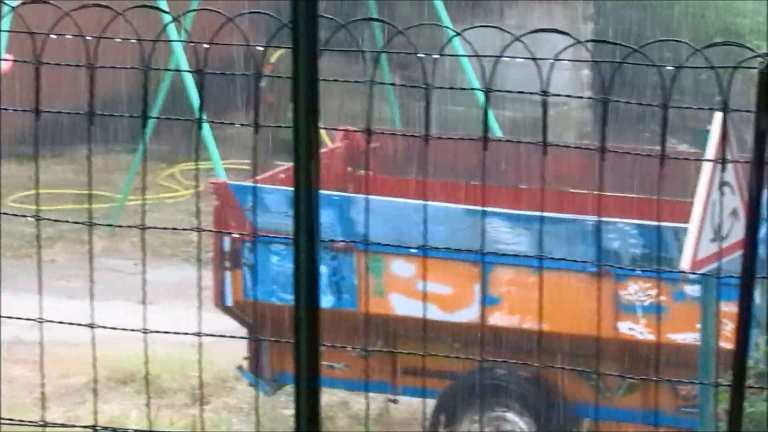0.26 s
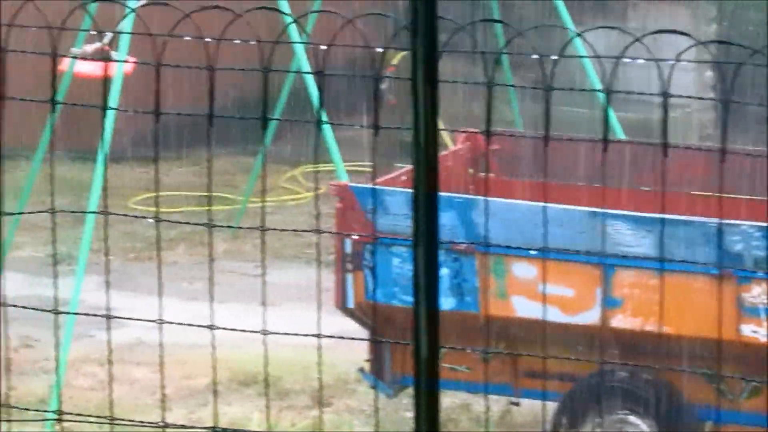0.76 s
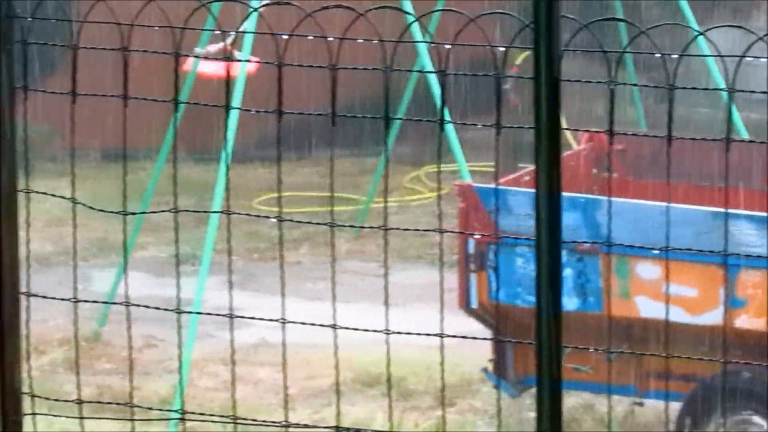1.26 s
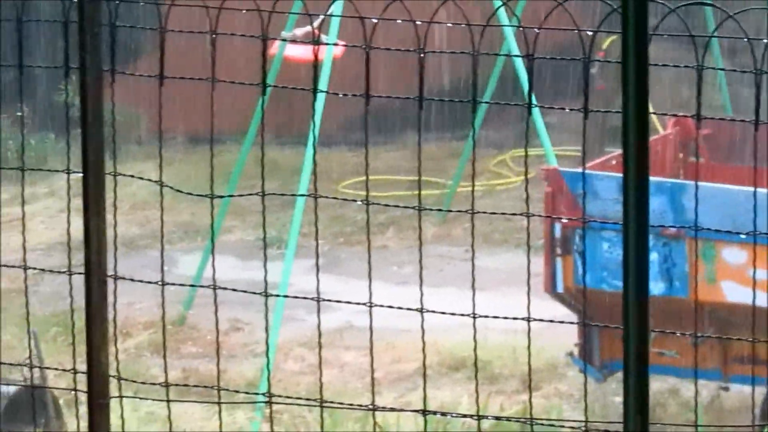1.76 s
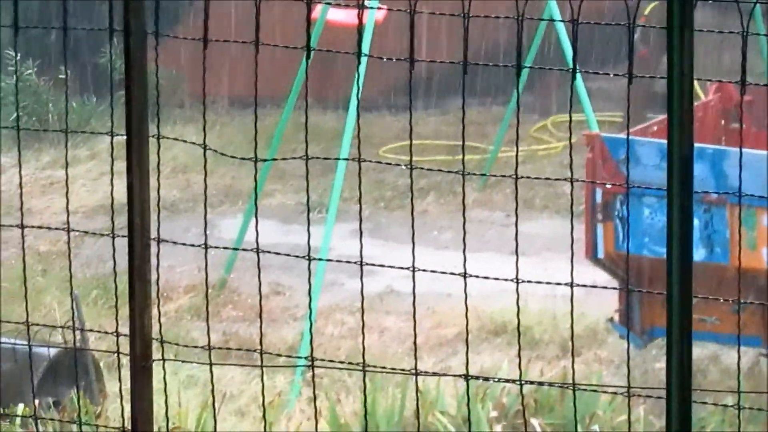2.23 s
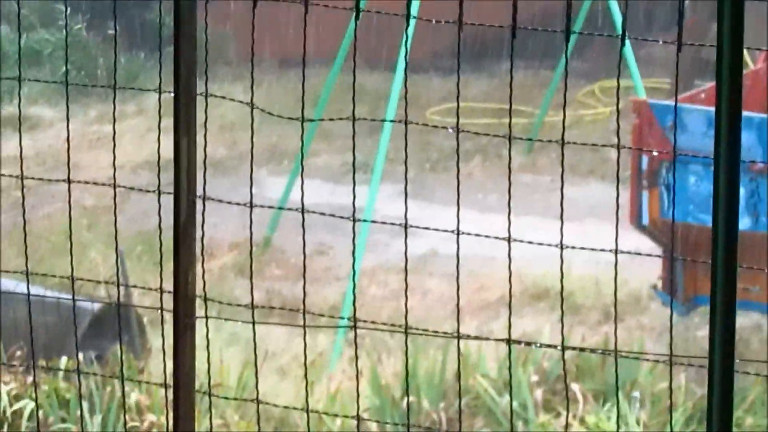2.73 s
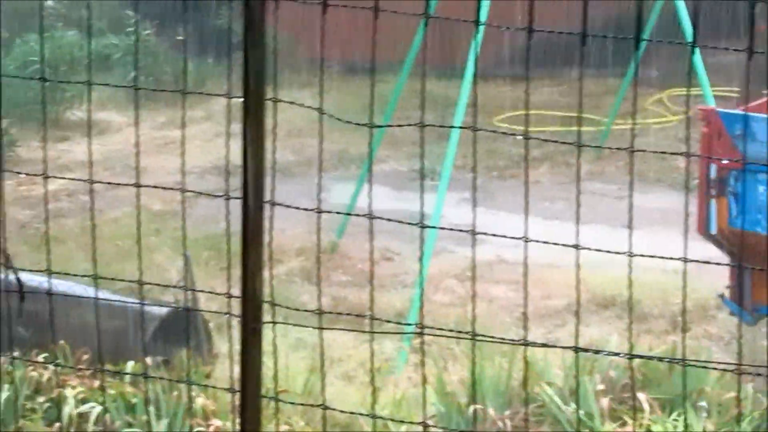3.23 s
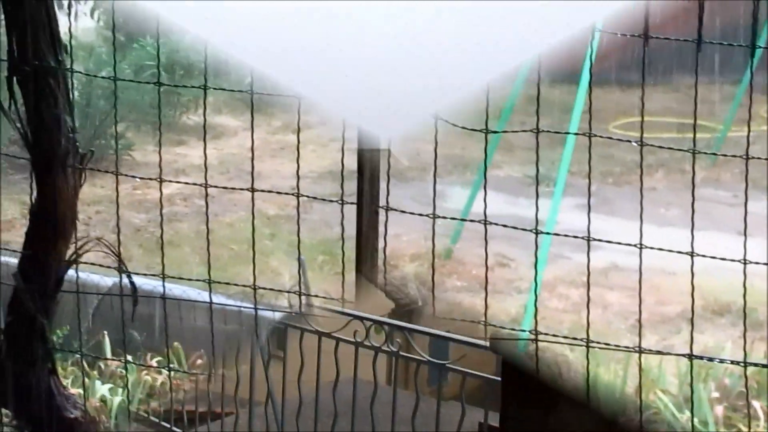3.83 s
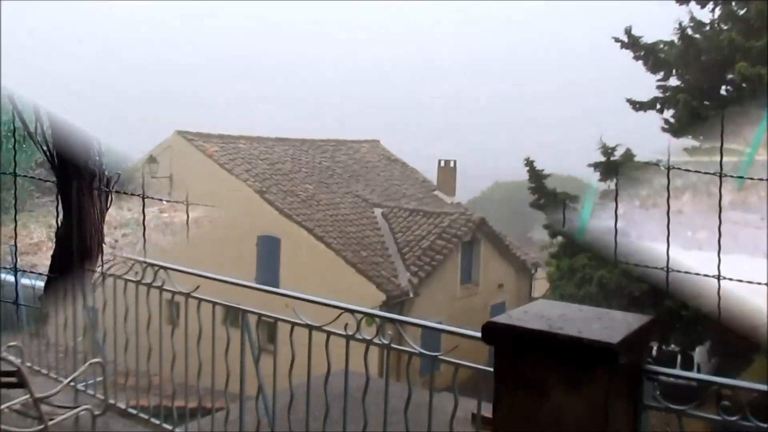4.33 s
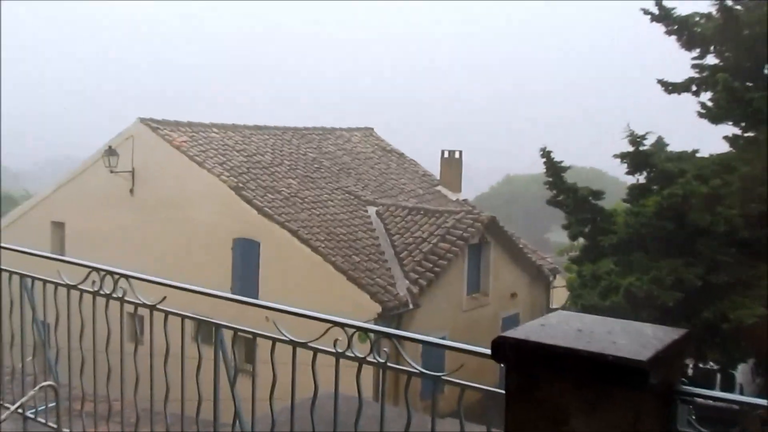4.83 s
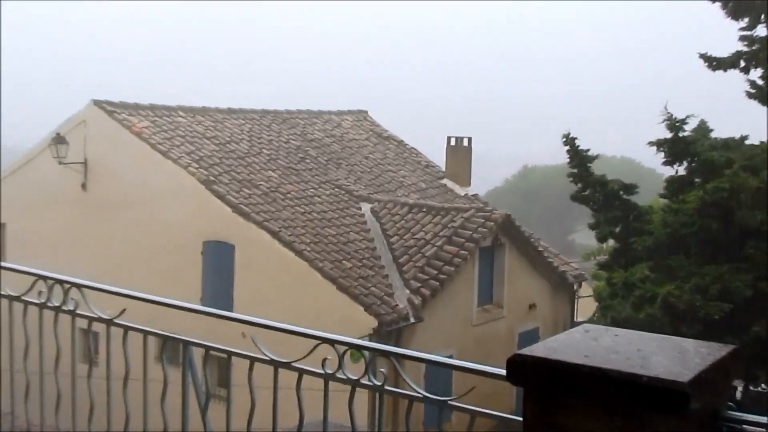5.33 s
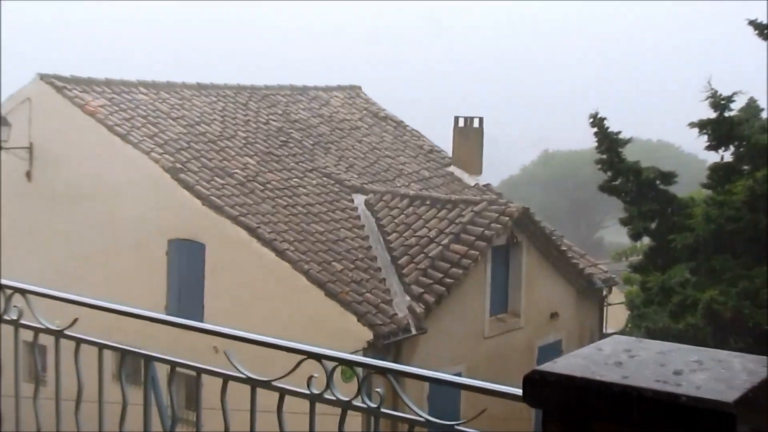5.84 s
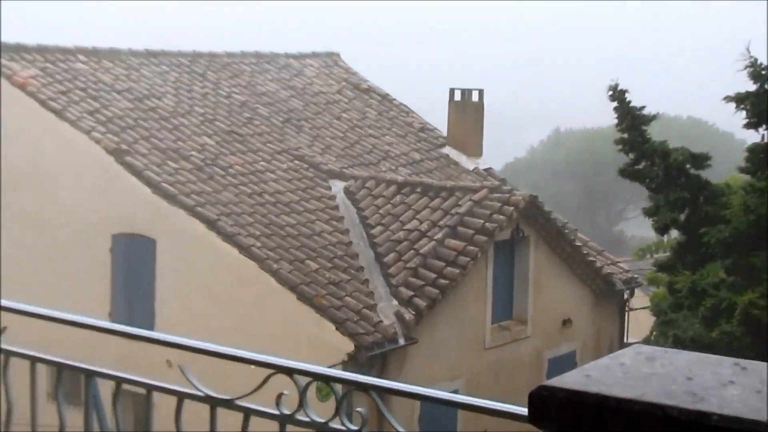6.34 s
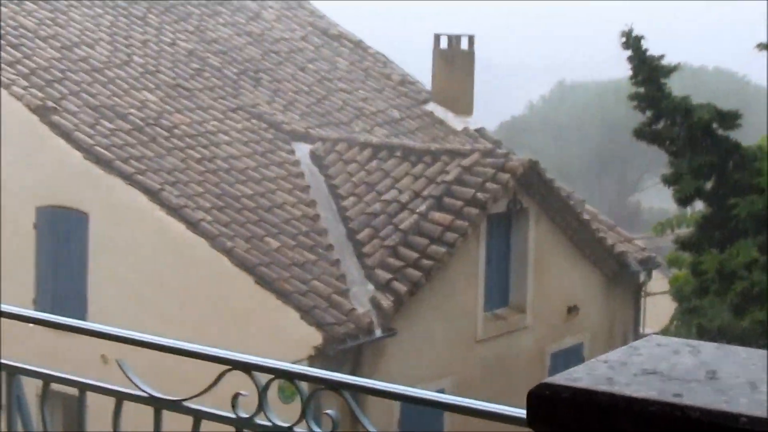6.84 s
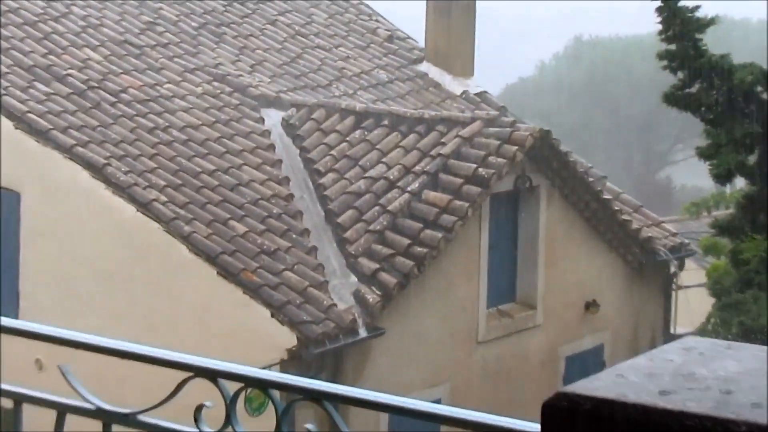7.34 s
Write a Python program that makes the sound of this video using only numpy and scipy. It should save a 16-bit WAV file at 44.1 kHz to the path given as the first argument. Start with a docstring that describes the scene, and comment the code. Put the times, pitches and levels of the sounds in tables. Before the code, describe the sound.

Outdoor stereo pickup close to a torrential downpour, wide and bright, with a roar from the field, crisp drop impacts and faint bubbling plips over a deep, low rumble. A hard switch drops the level dramatically to gentle rain around a terrace: light wet pattering, a muted wash from roofs and trees, sparse nearby drips, and a faint distant rush swelling late.

```python
"""Torrential rain on a yard: a roar from the field, countless drops ticking nearby, fat drops splashing in puddles.
Then, abruptly, much fainter rain heard from a terrace: a soft wash off roofs and trees, wet patter, a few drips.
Merged drops are noise flickering in time and pitch; single drops are damped sines, and the closest are sharp
pulses or swelling bands of noise. Deep rumble lies under the downpour, a far rush and a thin hiss behind the rest."""
import sys
import numpy as np
from scipy import signal
from scipy.fft import rfft, irfft, next_fast_len
from scipy.io import wavfile
from scipy.ndimage import uniform_filter1d, map_coordinates

SR = 44100
rng = np.random.default_rng(int(sys.argv[2]) if len(sys.argv) > 2 else 0)


def to_wav(s):
    """Save 16-bit WAV."""
    ch = np.atleast_2d(s).T  # columns
    pcm = np.round(np.clip(ch, -1, 1) * 32767)  # PCM
    wavfile.write(sys.argv[1], SR, pcm.astype(np.int16))


N = 334712

CHANGE_S = 4.670  # the downpour gives way to the faint rain
# How hard the downpour falls, in slow surges. Each row: time in seconds, reference level in dB.
RAIN_FLOW = [(0, -27.5), (0.12, -28), (0.22, -26), (0.39, -27), (0.5, -25.3), (1.08, -24.5), (1.68, -23),
             (1.96, -25), (2.35, -23.5), (2.44, -27), (2.68, -26.9), (2.8, -25.5), (3.12, -25),
             (3.57, -23.5), (3.98, -26), (4.22, -24), (4.29, -27), (4.65, -25.5)]
# Likeness of the two ears on the terrace. Each row: frequency in Hz, left-right correlation from -1 to 1.
TERRACE_CORRELATION = [(100, 0.65), (600, 0.75), (1000, 0.4), (1400, 0.31), (1700, 0.69), (3000, 0.1),
                       (5200, 0.81), (7500, -0.46), (14000, -0.18)]
# Balance of the two ears on the terrace. Each row: frequency in Hz, left minus right in dB.
TERRACE_BALANCE = [(500, -1), (1300, -1), (1800, 0), (3400, 0), (4400, 6.5), (7500, -1), (12000, 1)]


def amp(db):
    """Amplitude ratio from decibels: 20 dB is a factor of ten."""
    return 10 ** (np.asarray(db) / 20)


def unit(x):
    """Normalization: scale to a root mean square of 1 over all channels together."""
    return x / np.sqrt(np.mean(x ** 2) + 1e-20)


def along(points, hz):
    """Interpolation of (Hz, value) points on a logarithmic frequency axis, as pitch is heard."""
    f, v = np.transpose(points)
    return np.interp(np.log(hz + 1), np.log(f + 1), v)


def curves(rows):
    """Linear interpolation in time: one value per sample for each column after the seconds."""
    s, *columns = np.transpose(rows)
    return [np.interp(np.arange(N) / SR, s, column) for column in columns]


def wobble(rate):
    """Band-limited fluctuation: a smooth curve through random knots, rate of them a second."""
    knots = rng.standard_normal(int(N * rate / SR) + 4)
    return map_coordinates(knots, [np.arange(N) * rate / SR])


def filtered(x, response):
    """Linear filtering: multiply the spectrum by a response of frequency, with padding against wrap-around."""
    m = next_fast_len(N + SR // 2)
    return irfft(rfft(x, m) * response(np.fft.rfftfreq(m, 1 / SR)), m)[..., :N]


def add(track, s, sound):
    """Superposition: mix a stereo sound in at time s, cut at the end of the track."""
    part = track[:, round(s * SR):][:, :sound.shape[1]]
    part += sound[:, :part.shape[1]]


def rush(patchy_db, count, centre_hz, spread, width_hz, life_s, size_db, splash_db):
    """Merged drops tend to noise: two unrelated noises share flares, each in a band of its own, from nearer drops."""
    hz, t, noise = signal.stft(rng.standard_normal((2, N)), SR, nperseg=256)
    when, pitch, near = rng.random((count, 3)).T
    centres = centre_hz * np.exp(spread * (2 * pitch - 1))
    widths = width_hz * np.sqrt(centres[:, None] / centre_hz)
    bands = np.exp(-((hz - centres[:, None]) / widths) ** 2)
    powers = amp(size_db * np.minimum(-np.log(near), 4))[:, None] ** 2  # few are strong
    flares = np.zeros((len(t), len(hz)))
    np.add.at(flares, (when * len(t)).astype(int), bands * powers)
    # each flare starts at once and dies away exponentially
    flares = signal.lfilter([1], [1, -np.exp(-t[1] / life_s)], flares, axis=0).T
    power = 1 + amp(splash_db) ** 2 * flares / flares.mean(axis=1).max()
    # random patches of time and frequency, louder or softer than the rest
    patches = uniform_filter1d(rng.standard_normal(power.shape), size=18, axis=1)
    patches = uniform_filter1d(patches, size=3, axis=0)
    gain = np.sqrt(power / power.mean(axis=1, keepdims=True)) * amp(patchy_db * unit(patches))
    return unit(signal.istft(noise * gain, nperseg=256)[1][:, :N])


def placed(x, spectrum, alike, lean):
    """Interaural coherence: colour two unrelated signals and mix them as mid and side into a pair of rms 1."""
    def turn(hz):
        # the cosine of twice this angle is the left-right correlation
        return np.arccos(np.clip(along(alike, hz), -1, 1)) / 2

    def colour(hz):
        return amp(along(spectrum, hz)) * [np.cos(turn(hz)), np.sin(turn(hz))]

    mid, side = filtered(x, colour)
    pair = np.array([mid + side, mid - side])
    return unit(filtered(pair, lambda hz: amp(np.outer([.5, -.5], along(lean, hz)))))


def grains(count, centre_hz, spread, cycles, size_db, rise):
    """Damped resonance: drops at random times and bearings ring as sines whose pitch climbs by rise as they fade."""
    when, bearing, near, phase = rng.random((count, 4)).T[:, :, None]
    hz = np.clip(centre_hz * np.exp(spread * rng.standard_normal((count, 1))), 1200, 15000)
    size = amp(size_db * np.minimum(-np.log(near), 4.5)) * np.sqrt(hz)
    k = np.arange(SR // 150)
    age = k / SR * hz / cycles  # in decay times, each lasting the given number of cycles
    tone = np.sin(2 * np.pi * (cycles * age * (1 + rise * age / 2) + phase))
    ring = size * np.exp(-age) * tone * (1 - k / len(k))
    at = ((when * N).astype(int) + k).ravel()
    ears = [np.bincount(at, (ring * side(2 * np.pi * bearing)).ravel(), N)[:N] for side in (np.cos, np.sin)]
    return unit(np.array(ears))


def stray_drops(count, over_db, scatter_db):
    """Random arrivals: rows (s, dB, a chance value from -1 to 1) over the downpour, louder when it falls harder."""
    when, size, draw = rng.random((count, 3)).T
    s = when * 4.6  # all start before this many seconds
    db = np.interp(s, *np.transpose(RAIN_FLOW)) + over_db + scatter_db * (2 * size - 1)
    return np.transpose([s, db, 2 * draw - 1])


def backdrop():
    """Band-pass noise: a hollow far rush swells and passes while a thin hiss fades away."""
    # Each row: time in seconds, hollow far rush in dB, thin hiss in dB.
    backdrop_levels = [(4.7, -68, -67), (5.6, -68, -66), (6.05, -58, -74), (6.35, -60, -73),
                       (6.8, -53.5, -80), (7.0, -66, -84), (7.6, -68, -84)]
    rush_db, hiss_db = curves(backdrop_levels)
    rush_db = rush_db + 1.4 * wobble(rate=13)
    # spectra as (Hz, dB): two close peaks sound hollow, one narrow high band sounds thin
    hollow_spectrum = [(300, -34), (500, 3.5), (580, -5), (670, 5.5), (800, -16), (1300, -40)]
    thin_spectrum = [(8000, -40), (9000, -2), (9500, 0), (10500, -40)]
    hollow = placed(rng.standard_normal((2, N)), hollow_spectrum, TERRACE_CORRELATION, TERRACE_BALANCE)
    thin = placed(rng.standard_normal((2, N)), thin_spectrum, [(9000, .4)], TERRACE_BALANCE)
    return amp(rush_db) * hollow + amp(hiss_db) * thin


def rumble():
    """Low-frequency noise: a deep outdoor rumble under the downpour, its level falling linearly in decibels."""
    # Each row: frequency in Hz, relative spectral level in dB.
    rumble_spectrum = [(15, -25), (30, -7.5), (56, 5), (72, -4), (130, -30), (400, -90)]
    start_db, fade_db_per_s = -58.5, 1.5
    db = start_db - fade_db_per_s * np.arange(N) / SR
    return amp(db) * placed(rng.standard_normal((2, N)), rumble_spectrum, [(50, 0.69)], [(50, 0)])


def light_rain():
    """Incoherent summation: drops on roofs and trees merge into a soft wash under the terrace's wet patter."""
    # Each row: time in seconds, wash in dB, patter in dB, both before the fixed trims below.
    drizzle_levels = [(4.72, -53, -47.5), (6.06, -52.5, -47.5), (7.58, -52.5, -46)]
    # The far wash. Each row: frequency in Hz, relative spectral level in dB.
    wash_spectrum = [(15, -30), (30, -9), (55, -13), (84, 0), (105, -8), (150, -2.5), (190, -5),
                     (235, -0.5), (290, -4.5), (400, -2), (495, -1), (780, -4.5), (1200, -5), (1450, -7.5),
                     (1950, -24)]
    # The near patter. Each row: frequency in Hz, relative spectral level in dB.
    patter_spectrum = [(1000, -28), (1470, -9), (1620, -1.5), (1830, 0), (2050, -4.5), (2300, -1.5),
                       (2600, -5), (2850, -3), (3200, -4.5), (4200, -4.5), (5000, -8.5), (6200, -13),
                       (8000, -15.5), (10200, -19), (12000, -18.5), (15700, -33)]
    wash_db, patter_db = curves(drizzle_levels)
    far = rush(patchy_db=1, count=2000, centre_hz=700, spread=.8, width_hz=330,
               life_s=0.0067, size_db=1.5, splash_db=-7)
    wash = amp(wash_db + 0.66) * placed(far, wash_spectrum, TERRACE_CORRELATION, TERRACE_BALANCE)
    splats = rush(patchy_db=0.35, count=2200, centre_hz=3200, spread=1.0, width_hz=690,
                  life_s=.011, size_db=1.0, splash_db=-2.0)
    taps = grains(count=2800, centre_hz=2810, spread=0.392, cycles=9, size_db=2, rise=0.017)
    near = splats + amp(-15.0) * taps
    patter = amp(patter_db + 2.0) * placed(near, patter_spectrum, TERRACE_CORRELATION, TERRACE_BALANCE)
    lead_s = .00004  # the left ear leads, so the patter lies a little to the left
    return wash + filtered(patter, lambda hz: np.exp(1j * np.pi * lead_s * np.outer([1, -1], hz)))


def splashes():
    """Band noise under a swell-and-fade envelope: the finer its droplets, the higher, wider and longer a splash."""
    # The fattest splashes and drips.
    # Each row: start in seconds, noise level in dB before the envelope, centre frequency in Hz.
    fat_drops = [(0.22, -26, 7500), (0.484, -27.5, 3900), (1.015, -25, 12000), (1.876, -22.5, 10000),
                 (2.064, -26.5, 4500), (2.35, -23, 11000), (3.03, -26.5, 4500), (3.183, -26, 3400),
                 (3.432, -22.5, 5000), (3.455, -26, 11000), (4.081, -24.5, 3500), (4.238, -22.5, 7000),
                 (4.833, -52, 9500), (5.413, -45, 3600), (5.555, -38.5, 5400), (5.559, -39, 2800),
                 (6.056, -43, 3500), (6.508, -47.5, 250), (6.511, -50.5, 12500), (6.621, -54, 12800),
                 (6.738, -45, 3300), (6.964, -46, 2500), (7.215, -49.5, 9000), (7.379, -37, 1780),
                 (7.411, -42, 1900)]
    bandwidth = 0.38  # share of the centre frequency
    stray_hz, stray_spread = 6500, 0.35  # centre of the other splashes and its relative scatter
    strays = [(s, db, stray_hz * np.exp(stray_spread * fineness))
              for s, db, fineness in stray_drops(count=14, over_db=-4.5, scatter_db=0)]
    out, t = np.zeros((2, N)), np.arange(SR // 6) / SR
    hz = np.fft.rfftfreq(len(t), 1 / SR)
    for s, db, centre_hz in [*fat_drops, *strays]:
        rise_s = 0.0047 * (centre_hz / 5000) ** .4  # finer spray lingers longer
        band = 1 / (1 + (2 * (hz - centre_hz) / (bandwidth * centre_hz)) ** 2)
        mid, side = irfft(rfft(rng.standard_normal((2, len(t)))) * band, len(t))
        side = side * np.minimum(centre_hz / 7000, 1)  # low splashes sound more alike in both ears
        envelope = t / rise_s * np.exp(1 - t / rise_s)  # peaks at 1 after rise_s
        add(out, s, amp(db) * unit(np.array([mid + side, mid - side])) * envelope)
    return out


def ticks():
    """Interaural time and level difference: a few sharp cycles reach the nearer ear first and louder."""
    # The closest hard impacts.
    # Each row: time in seconds, level in dB before the trim and ear gains, bearing from -1 (right) to 1 (left).
    hard_impacts = [(1.019, -6, .4), (1.726, -2, .1), (1.886, -4, -1), (2.419, -2, .6), (2.778, -6, -.4),
                    (3.456, -4, 1), (3.658, -3, -.7), (4.249, -5, .9)]
    pitch_hz, pitch_spread = 8900, .15  # typical pitch and its relative scatter
    strays = stray_drops(count=16, over_db=16, scatter_db=0.5)
    out, t = np.zeros((2, N)), np.arange(SR // 200) / SR
    for s, db, bearing in [*hard_impacts, *strays]:
        hz = pitch_hz * np.exp(pitch_spread * rng.standard_normal())
        toward = bearing * np.array([[1], [-1]])
        since = t - .001 + .00003 * toward  # seconds from the peak at each ear
        swell = np.exp(np.minimum(since / .00005, -since / .00019))  # quick rise, slower decay
        pulse = swell * np.cos(2 * np.pi * hz * since)
        add(out, max(s - .001, 0), amp(db - 1 + 2.5 * toward) * pulse)
    return out


def downpour():
    """Incoherent summation: far rain merges into a roar; nearer drops tick, throw spray and trap puddle bubbles."""
    # The far roar. Each row: frequency in Hz, relative spectral level in dB.
    roar_spectrum = [(47, -43), (80, -12), (123, -4.5), (224, -10), (276, -6.5), (394, -11), (522, -2.5),
                     (736, -3.5), (953, 0.5), (1160, -2), (1500, -6), (1950, -26), (3300, -120)]
    # The near spray. Each row: frequency in Hz, relative spectral level in dB.
    spray_spectrum = [(820, -37), (1400, -4.5), (2900, -2), (5370, -4.5), (8050, -1.5), (11000, -1.5),
                      (12700, -5), (15100, -16.5), (15700, -17)]
    # Likeness of the two ears in the yard. Each row: frequency in Hz, left-right correlation from -1 to 1.
    yard_correlation = [(150, 0.96), (450, 0.79), (900, 0.85), (1200, 0.6), (1600, 0.71), (3200, 0.24),
                        (5000, 0.36), (6000, 0.41), (8000, 0.074), (10500, -0.22), (15000, 0.13)]
    # Balance of the two ears in the yard. Each row: frequency in Hz, left minus right in dB.
    yard_balance = [(300, 0.5), (700, -1.5), (1000, -0.7), (2800, -2.8), (4200, 0.2), (7000, -1),
                    (9500, 0.5), (13000, -.4)]
    roar_over_db, spray_over_db = -10.5, 3  # relative to the flow
    roar_growth = 1.1  # dB of roar per dB of flow
    flutter_db, flutter_per_s = 0.48, 11  # quick chance changes of each layer around the flow
    # one flow drives both layers
    (flow_db,) = curves(RAIN_FLOW)
    usual_db = np.mean([db for s, db in RAIN_FLOW])
    roar_db = usual_db + roar_over_db + roar_growth * (flow_db - usual_db) + flutter_db * wobble(flutter_per_s)
    spray_db = flow_db + spray_over_db + flutter_db * wobble(flutter_per_s)
    far = rush(patchy_db=1.04, count=3000, centre_hz=1060, spread=0.87, width_hz=300,
               life_s=.006, size_db=0.5, splash_db=-1)
    roar = amp(roar_db) * placed(far, roar_spectrum, yard_correlation, yard_balance)
    mist = rush(patchy_db=0.23, count=2600, centre_hz=6360, spread=1.24, width_hz=2500,
                life_s=0.015, size_db=1.0, splash_db=-1)
    impacts = grains(count=9000, centre_hz=9000, spread=0.41, cycles=0.9, size_db=3.5, rise=0)
    bubbles = grains(count=1200, centre_hz=3520, spread=0.463, cycles=7, size_db=5.0, rise=0.037)
    near = mist + amp(-10) * impacts + amp(-23.5) * bubbles
    spray = amp(spray_db) * placed(near, spray_spectrum, yard_correlation, yard_balance)
    return roar + spray


def scene():
    """Superposition of all sources: the downpour gives way to the faint rain within a millisecond."""
    heavy = uniform_filter1d((np.arange(N) / SR < CHANGE_S) * 1., size=40)
    yard = downpour() + rumble()
    terrace = light_rain() + backdrop()
    return heavy * yard + (1 - heavy) * terrace + ticks() + splashes()


def record(dry):
    """Band limiting: a sharp low-pass keeps nothing from 15850 Hz upward."""
    return filtered(dry, lambda hz: hz < 15850)


dry = scene()
out = record(dry)
to_wav(out)
```